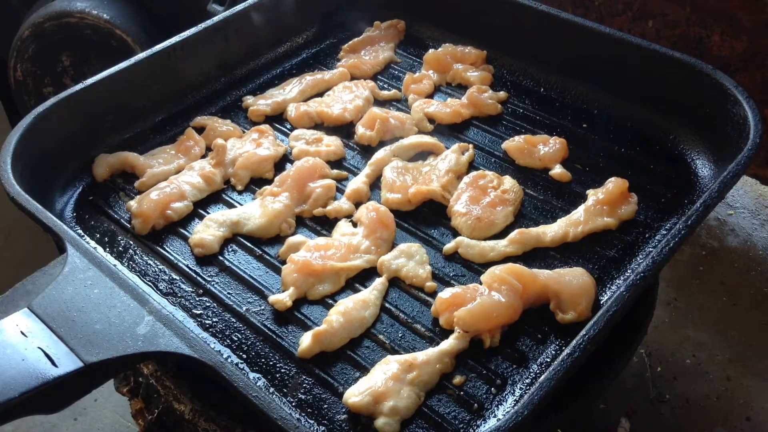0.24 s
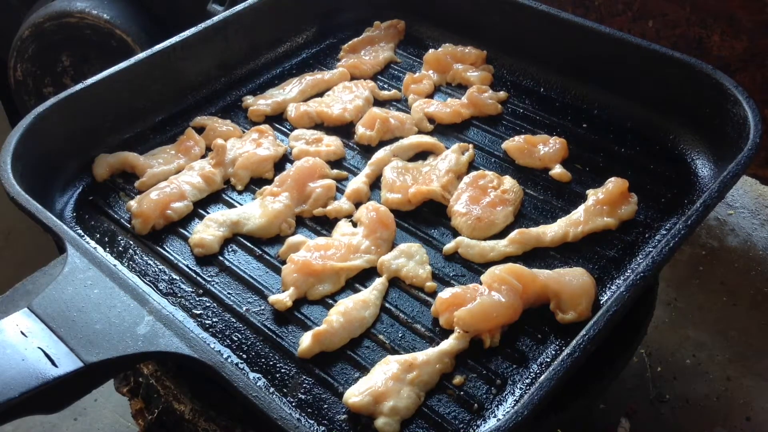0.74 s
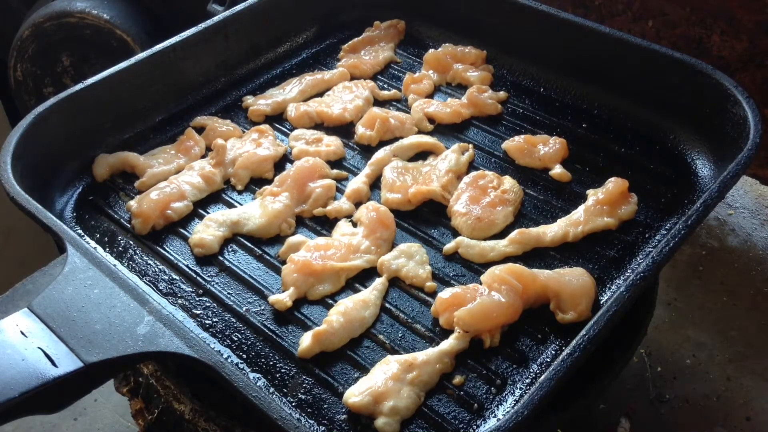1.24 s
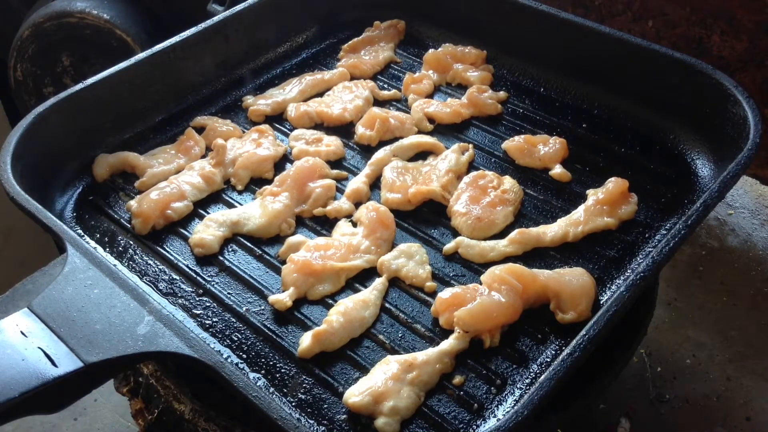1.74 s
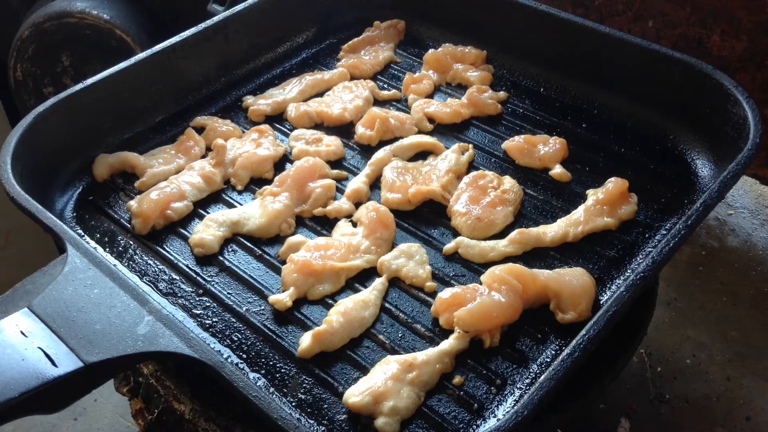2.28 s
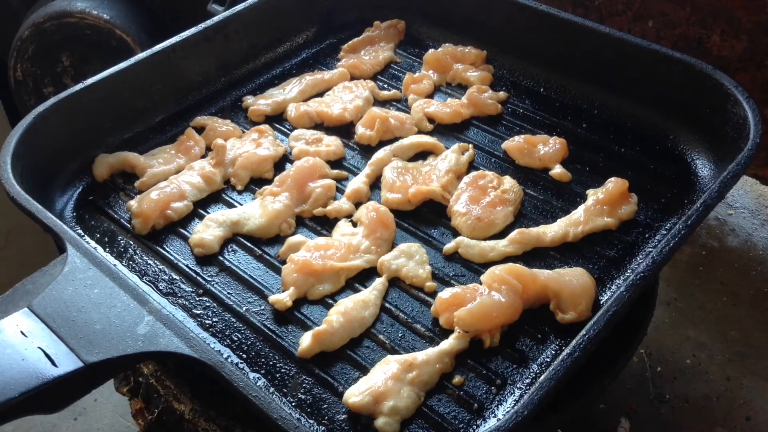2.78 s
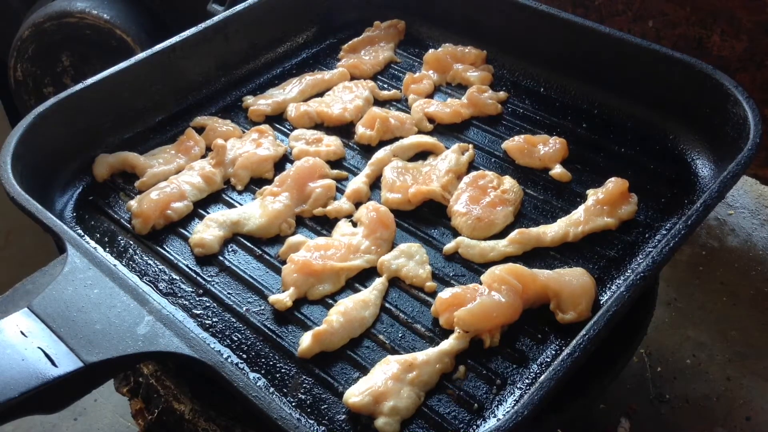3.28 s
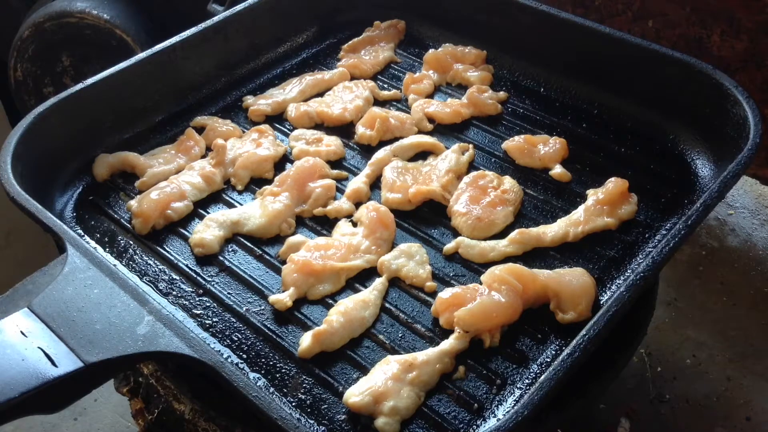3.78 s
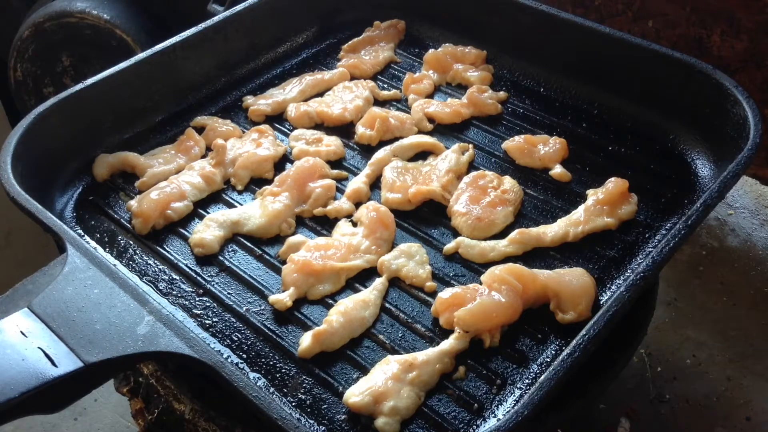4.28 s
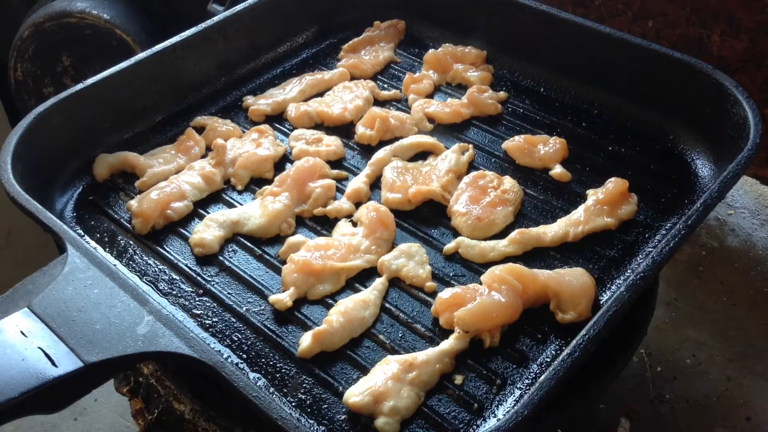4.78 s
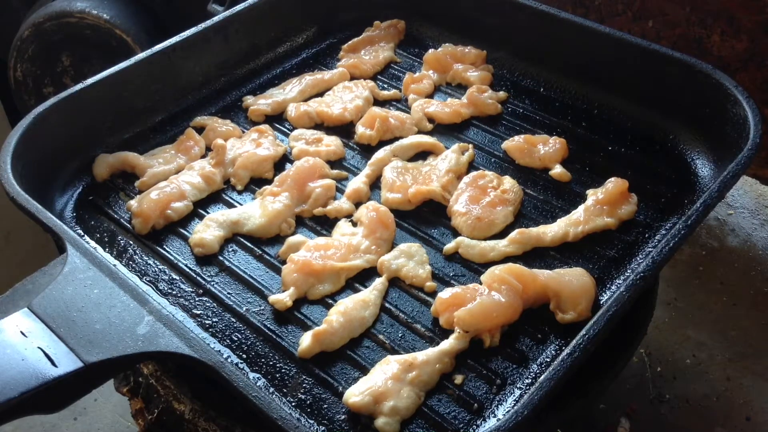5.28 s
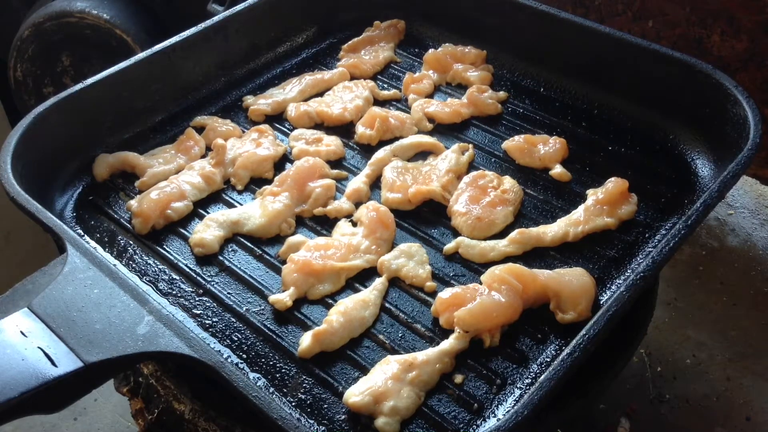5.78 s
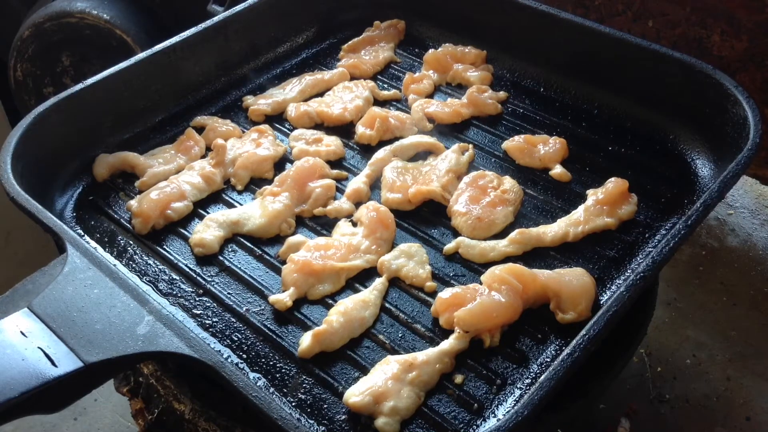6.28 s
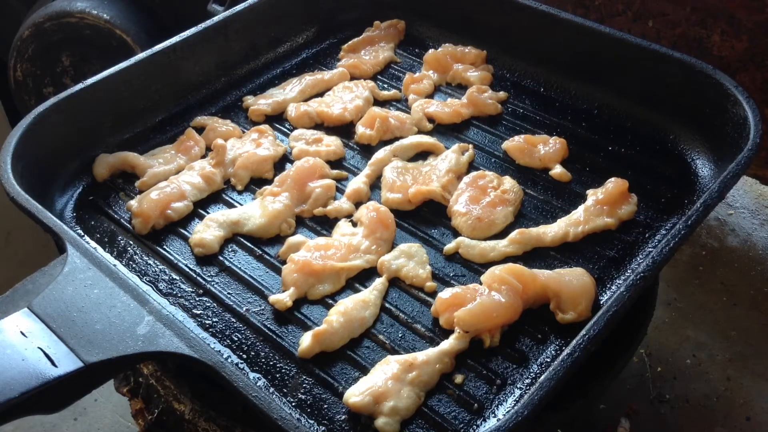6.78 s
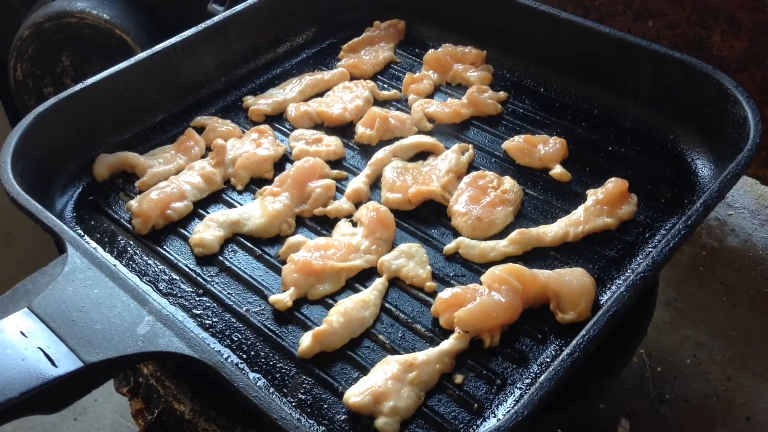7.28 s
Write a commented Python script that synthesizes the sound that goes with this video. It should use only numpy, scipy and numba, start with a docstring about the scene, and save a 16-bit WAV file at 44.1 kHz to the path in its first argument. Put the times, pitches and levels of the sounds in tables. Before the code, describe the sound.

A loud, bright frying sizzle heard up close, peppered with snapping drops, with a faint burner rush and one dull knock beneath.

```python
"""In a small kitchen, chicken strips sizzle on a hot ridged grill pan, close to a phone.
The sizzle is a shot-noise process: countless steam bubbles burst at random, in spurts, and each excites a damped
resonance. Now and then a drop spits: an impulse and its scatter ring with a pop, a crack and a snap.
Below lie the burner's rush, made of filtered noise, and one dull knock, a sum of decaying modes.
The loudest spits make the phone's gain control duck, and the level creeps back up."""
import sys
import numpy as np
from scipy import signal
from scipy.fft import rfft, irfft
from scipy.io import wavfile
from numba import njit

SR = 44100
rng = np.random.default_rng(int(sys.argv[2]) if len(sys.argv) > 2 else 0)


def output_pcm(signal):
    """Save a mono or channel-first signal as 16-bit PCM at the path in sys.argv[1].

    Samples are clipped to [-1, 1] before scaling.
    """
    pcm = np.clip(np.atleast_2d(signal).T, -1, 1) * 32767
    wavfile.write(sys.argv[1], SR, np.round(pcm).astype(np.int16))


N = 332514
TIME = np.arange(N) / SR  # s
FREQS = np.fft.rfftfreq(N, 1 / SR) + 1e-3  # Hz, kept off zero for logarithms and ratios
TOP_HZ = 15350  # upper band limit


def undb(db):
    """Amplitude gain is ten to the power of decibels over twenty."""
    return 10 ** (np.asarray(db) / 20)


def level(x, db):
    """Scaling to a given rms level fixes the mean power."""
    return x * undb(db) / np.sqrt(np.mean(x ** 2))


def follow(points, s):
    """Linear interpolation of (time [s], level [dB]) points gives the level at times s."""
    return np.interp(s, *np.transpose(points))


def colour(x, points):
    """Linear filtering: (frequency [Hz], gain [dB]) points, joined over log frequency, weight the spectrum."""
    hz, db = np.transpose(points)
    gain_db = np.interp(np.log(FREQS), np.log(hz), db)
    return irfft(rfft(x) * undb(gain_db), N)


def cut_top(x):
    """Band limitation: a steep elliptic low-pass, run both ways for zero phase."""
    low_pass = signal.ellip(10, .05, 60, TOP_HZ, fs=SR, output="sos")
    return signal.sosfiltfilt(low_pass, x)


def resonance(hz, q, freqs):
    """Damped resonance: the complex response of a single mode, with gain 1 at its centre."""
    return 1 / (1 + 1j * q * (freqs / hz - hz / freqs))


def walk(rate):
    """Slow random modulation: normal values, rate of them a second, joined by lines and scaled to rms 1."""
    knots = rng.standard_normal(4096)
    return level(np.interp(TIME * rate, np.arange(len(knots)), knots), 0)


def bursts(per_s, spread_db):
    """Shot noise: clicks at random moments, most tiny and a few large, none beyond the largest bubble."""
    happens = rng.random(N) < per_s / SR
    size = np.minimum(rng.exponential(size=N), 6.5)
    sign = rng.choice([-1, 1], N)
    return level(happens * undb(spread_db * size) * sign, 0)


def burner(flutter_db=2.0):
    """Turbulent flow noise: the flame's low rush is shaped random noise with an unsteady level."""
    # colour of the rush: (frequency [Hz], relative density [dB per Hz])
    rush_colour = [(30, -52), (80, -26), (105, -23), (145, -1.5), (170, -3), (191, 5), (212, -2),
                   (238, 0.5), (280, -7.5), (335, -4), (380, -8.5), (430, -21), (700, -24)]
    # level before the flutter: (time [s], level [dB])
    rush_level = [(0, -53), (1.2, -50.5), (2.7, -50.5), (4.5, -50.5), (5.4, -49.5), (6.3, -52),
                  (7.54, -51.5)]
    rush = level(colour(rng.standard_normal(N), rush_colour), 0)
    return rush * undb(follow(rush_level, TIME) + flutter_db * walk(rate=7))


def kitchen(x, t60_s=.3, tail_db=-8):
    """Reverberation: hard walls add a diffuse, exponentially decaying tail 6 ms behind the direct sound."""
    age = TIME[:SR // 2]
    tail = rng.standard_normal(len(age)) * undb(-60 * age / t60_s) * (age > .006)
    return x + undb(tail_db) * signal.fftconvolve(x, tail / np.linalg.norm(tail))[:N]


def knock(low_hz=190):
    """Modal impact: a bump near the stove; long, soft contact favours low modes, and deep bass does not radiate."""
    # a soft contact, then a hard one: (time [s], level [dB], contact time [s])
    contacts = [(4.533, -31, .002), (4.5392, -36, .0002)]
    # modes that ring: (frequency [Hz], relative level [dB], 60 dB decay time [s])
    modes = [(257, -4, .16), (307, -3.5, .25), (364, -1.5, .16), (490, -1, .14), (667, -1, .07),
             (850, 5, .04), (950, 0, .07)]
    out = np.zeros(N)
    for s, db, contact_s in contacts:
        age = np.maximum(TIME - s, 0)
        for hz, mode_db, t60_s in modes:
            softening = 1 + (hz * contact_s) ** 2
            decay = undb(db + mode_db - 60 * age / t60_s)
            out += decay * np.sin(2 * np.pi * hz * age) / softening
    return signal.sosfilt(signal.butter(4, low_hz, "high", fs=SR, output="sos"), out)


def boil(s):
    """Source strength follows boiling: how hard the juices boil at times s, in dB."""
    # course of the boil: (time [s], strength [dB])
    boil_course = [(0.0, -0.3), (0.25, 0.7), (0.62, 0.8), (0.76, -0.5), (1.12, 0.3), (1.27, 1.3),
                   (1.45, 1.3), (1.54, 2.7), (1.74, 1.1), (2.1, 1.9), (2.45, 2.1), (2.83, -0.1),
                   (2.97, 0.9), (3.15, -0.3), (3.45, 0.2), (4.35, -0.3), (5.0, 0.1), (5.14, 1.3),
                   (5.3, 0.1), (5.5, 1.1), (6.45, -0.9), (6.63, 1.5), (6.8, 0.6), (7.54, 0.7)]
    return follow(boil_course, s)


def pan(x):
    """Resonant emphasis: the pan lifts the sound around each of its resonances."""
    # resonances of the pan: (frequency [Hz], width [Hz], lift [dB])
    pan_rings = [(505, 22, 4), (583, 28, 4.5), (745, 22, 3.5), (830, 25, 2), (958, 28, 2.5), (1215, 35, 2),
                 (4120, 140, 1.6), (4730, 150, 1.5)]
    lift_db = sum(db * abs(resonance(hz, hz / width, FREQS)) ** 2 for hz, width, db in pan_rings)
    return irfft(rfft(x) * undb(lift_db), N)


def lesser_drops(scatter_db=-13, count=300, size=3):
    """Clustered point process: small groups of fine or coarse drops, likelier and louder in a hard boil."""
    drops_per_s, growth_per_db, cluster_s = 26, 0.25, .012  # rate at 0 dB boil, its growth, mean lag
    softest_db, loudest_db = -13, -5.5  # fine drops at 0 dB boil
    coarse_fall_db = 7  # a fully coarse drop peaks this much lower
    # moment, luck and kind are shared within a cluster
    when, luck, kind = np.repeat(rng.random((count, 3)), size, axis=0).T
    lag, strength, own = rng.random((count * size, 3)).T
    s = when * TIME[-1] - cluster_s * np.log(lag)
    coarse = kind * np.sqrt(own)
    db = softest_db + strength * (loudest_db - softest_db) + boil(s) - coarse_fall_db * coarse
    # pop and crack against the snap, from a fine drop to a coarse one
    pop_db = np.interp(coarse, [0, 1], (-28, -8))
    crack_db = np.interp(coarse, [0, 1], (-15, 3))
    rows = np.column_stack([s, db, pop_db, crack_db, np.full(len(s), scatter_db)])
    per_s = drops_per_s * np.exp(growth_per_db * boil(s))
    return rows[luck < per_s * TIME[-1] / len(rows)]


def spits(drops, detune_octaves, scatter_s):
    """Impulse response: a drop's burst, scattered off meat and pan walls, rings as pop, crack and snap."""
    # pop, crack and snap of a bursting drop: (frequency [Hz], Q [1])
    drop_rings = [(1200, .6), (4000, .9), (10200, 1.3)]
    size = 1024
    freqs, age = np.fft.rfftfreq(size, 1 / SR) + 1e-3, np.arange(size) / SR
    out = np.zeros(N + size)
    for s, db, pop_db, crack_db, scatter_db in drops:
        # a unit impulse, then its decaying scatter
        push = undb(scatter_db) * rng.standard_normal(size) * np.exp(-age / scatter_s)
        push[0] = 1
        push_spectrum = rfft(push) * (freqs < TOP_HZ)
        gains = (undb(pop_db), -undb(crack_db), 1)
        burst = 0
        for (hz, q), gain in zip(drop_rings, gains):
            detuned_hz = hz * 2 ** (detune_octaves * rng.uniform(-0.76, 1))
            ring = push_spectrum * resonance(detuned_hz, q, freqs) ** 2
            burst = burst + gain * ring / np.linalg.norm(ring)
        # the shift leaves room for the ripple that the sharp band limit puts before the burst
        drop = np.roll(irfft(burst), size // 64)
        start = int(s * SR) % N
        out[start:start + size] += undb(db) * drop / abs(drop).max()
    return out[:N]


def sizzle(q=1.8, shared_db=0.53, patch_db=1.04, spurt_db=1.83, snap_db=-13, wash_db=0.0,
           bubbles_per_s=1100, spread_db=3.0):
    """Bubble resonance: bubbles of every size burst and ring for a cycle or two, each size in its own spurts."""
    # fine fizz against coarse crackle: (time [s], treble up and middle down [dB])
    fizz_balance = [(0, -0.5), (.35, 1.8), (.8, -0.5), (1.3, 0.8), (1.8, 0.5), (2.6, -0.3), (3.1, -1),
                    (3.33, 0.2), (3.6, -.5), (4.6, -0.4), (5.7, .5), (6.8, -0.2), (7.54, -0.5)]
    # colour of the sizzle ahead of the pan's lift: (frequency [Hz], relative density [dB per Hz])
    sizzle_colour = [(100, -58), (430, -33), (540, -16), (800, -12.7), (1200, -10.5), (1430, -11.8),
                     (1700, -10.2), (2000, -7.8), (2650, -7), (2900, -5.9), (3720, -4.9), (3930, -6.6),
                     (4100, -4.5), (4560, -4.8), (5500, -2.3), (6700, -3.2), (8400, -2.1), (10100, .6),
                     (12000, -2), (13500, -1.7), (15300, -4.6)]
    heat_db, fizz_db = boil(TIME), follow(fizz_balance, TIME)
    sputter_db = shared_db * walk(rate=70)
    spectrum, power = 0, 0
    for hz in np.geomspace(700, 14000, 12):
        fineness = np.interp(hz, [5000, 9000], [-1, 1])
        boil_db = heat_db + fineness * fizz_db + patch_db * walk(rate=36) + sputter_db
        # large, low bubbles are rarer than small ones
        clicks = bursts(bubbles_per_s * (hz / 5000) ** .25, spread_db)
        direct = clicks * undb(spurt_db * walk(rate=260))
        # the kitchen walls blur bursts from all over the pan into a smooth wash
        wash = undb(wash_db) * rng.standard_normal(N)
        ring = resonance(hz, q, FREQS)
        spectrum = spectrum + ring * rfft((direct + wash) * undb(boil_db))
        power = power + abs(ring) ** 2
    # even out the summed response of all sizes
    bubbles = irfft(spectrum / np.sqrt(power), N)
    # thin films of fat snap without ringing, across all pitches at once
    snaps = undb(snap_db) * bursts(per_s=1100, spread_db=3.8)
    frying = level(cut_top(bubbles + snaps * undb(heat_db)), 0)
    # soft limit: rounds off the very highest peaks of the sizzle
    frying = np.tanh(frying / 12)
    return level(cut_top(pan(colour(frying, sizzle_colour))), -21.1)


def scene():
    """Superposition: sizzle and burner add to the drops and the knock, which the kitchen reverberates."""
    # single spitting drops, loud and moderate; pop and crack against the high snap, scatter against the impulse:
    # (time [s], peak level [dB], hollow pop [dB], crack [dB], scatter [dB])
    single_drops = [(0.1, -3.2, -28, -11, -24), (0.275, -3.9, -24, -14, -12), (0.401, -3.6, -11, -2, -18),
                    (0.507, -3.2, -17, -6, -15), (0.577, -6.5, -13, -3, -12), (0.859, 0.5, -15, -8, -15),
                    (0.915, -2, -22, -12, -18), (0.933, -1.2, -15, -5, -27), (1.276, -2.4, -18, -6, -27),
                    (1.326, -1.7, -27, -12, -18), (1.509, -3.2, -15, -3, -15), (1.544, -2.2, -20, -9, -13),
                    (1.548, 1.1, -31, -18, -18), (1.562, -3.4, -16, -5, -12), (1.75, -2.6, -15, -11, -22),
                    (1.851, -2.4, -25, -9, -18), (1.968, -0.8, -21, -12, -15), (2.012, -2.6, -12, -4, -18),
                    (2.026, -1.5, -15, -8, -27), (2.066, -2.4, -9, -4, -9), (2.095, -5.5, -13, -2, -11),
                    (2.13, 0.4, -2.5, 2.5, -9), (2.161, -0.6, -5, 0, -10), (2.276, 0.4, -27, -3, -16),
                    (2.331, -5, -18, -1, -11), (2.352, -5, -11, -10, -11), (2.393, 0, -28, -11, -27),
                    (2.42, -4.5, -7, -5, -10), (2.453, -1.2, -28, -12, -12), (2.552, -8, -3, -6, -12),
                    (2.654, -7, -6, -3, -15), (2.699, -0.6, -24, -10, -15), (2.99, 0.5, -9, 1.5, -8.5),
                    (3.087, 6.4, -24, -7, -27), (3.275, -4.6, -13, -9, -18), (3.606, -5.8, -4, 8, -11),
                    (3.728, -4.8, -26, -5, -16), (4.267, -4.4, -16, -4, -18), (4.488, -5.2, -6, -4, -18),
                    (4.758, -4.2, -22, -7, -18), (4.862, -7.6, -6, -7, -11), (5.146, -5, -29, -12, -12),
                    (5.279, -4.6, -14, -5, -22), (5.51, 0.8, -22, -10, -22), (5.524, -3.2, -23, -20, -12),
                    (5.596, -3.6, -28, 0, -18), (6.017, -10, -4, -3, -11), (6.62, -2.2, -24, -8, -22),
                    (6.696, 2.3, -16, -1, -27), (6.752, -3.2, -14, -4, -22), (6.901, -6, -18, 2, -12),
                    (6.945, -7, -13, -1, -9), (7.277, -5, -19, -4, -8), (7.301, -2.2, -19, -8, -24),
                    (7.387, -4.2, -17, -3, -22)]
    single = spits(single_drops, detune_octaves=.1, scatter_s=.0008)
    clustered = spits(lesser_drops(), detune_octaves=.25, scatter_s=.001)
    return (sizzle() + burner() + kitchen(single + clustered + knock()))[None]


@njit
def peak_hold(over_db, keep):
    """Peak detection: jump to each new peak, then sink by a fixed share a sample."""
    held, out = 0., np.empty(len(over_db))
    for i in range(len(over_db)):
        held = max(held * keep, over_db[i], 0.)
        out[i] = held
    return out


def record(dry):
    """Automatic gain control: peaks over a ceiling duck the level, which recovers slowly; clipping follows."""
    ceiling_db, recovery_s, clip_db = -.2, .85, -1.5
    x = dry[0]
    over_db = 20 * np.log10(abs(x) + 1e-9) - ceiling_db
    duck_db = peak_hold(over_db, np.exp(-1 / (recovery_s * SR)))
    # the control acts three samples late, so the onset of a peak runs into the clipping
    late_db = np.concatenate([np.zeros(3), duck_db[:-3]])
    clipped = np.clip(x * undb(-late_db), -undb(clip_db), undb(clip_db))
    return cut_top(clipped)[None]


dry = scene()
out = record(dry)
output_pcm(out)
```